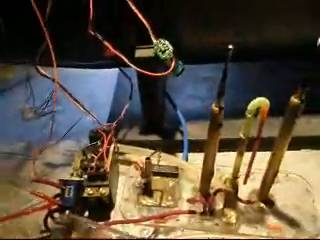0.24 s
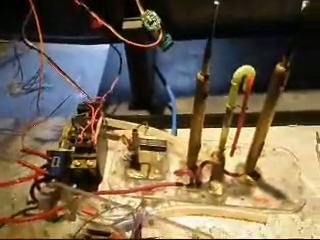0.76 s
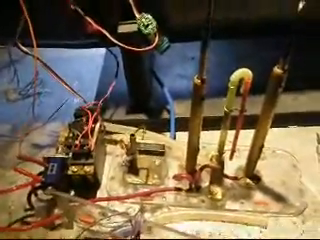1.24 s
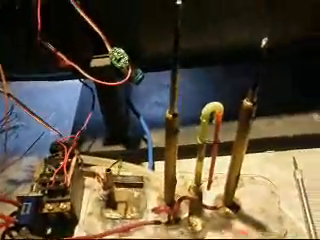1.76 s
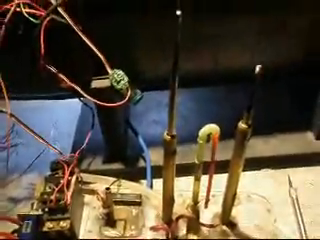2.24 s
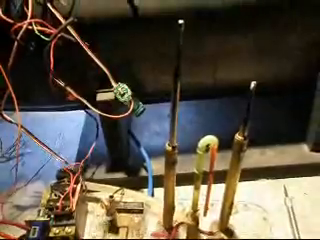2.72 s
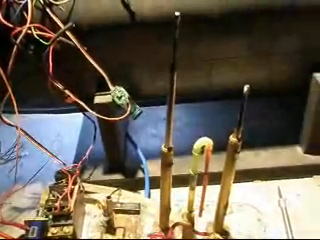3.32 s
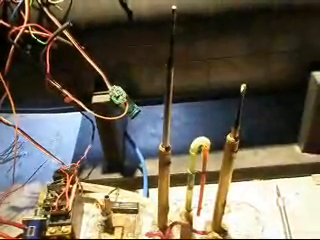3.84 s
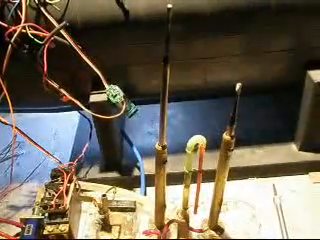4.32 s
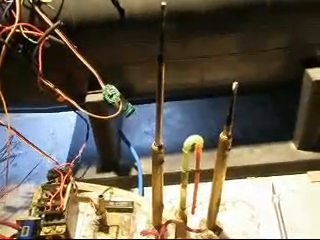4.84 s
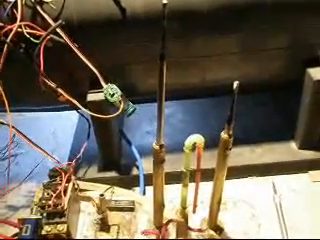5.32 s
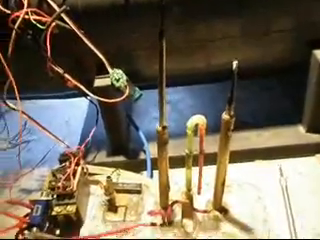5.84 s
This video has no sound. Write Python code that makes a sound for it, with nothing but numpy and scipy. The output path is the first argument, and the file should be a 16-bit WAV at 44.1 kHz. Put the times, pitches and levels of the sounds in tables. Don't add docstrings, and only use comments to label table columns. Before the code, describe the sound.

For the first 0.77 seconds there is only faint, dull workshop air and slight handling rumble. At about 0.79 a bright plastic switch click cracks, and a small brushed motor runs up within a twentieth of a second into a loud, buzzy air-pump whine, with a fundamental around 260 Hz and many strong harmonics, rough with rattling housing and brush swish. The bench hums underneath, kicking at first, then firmer from 2.1. Brief tonal flickers come between 2.1 and 2.8; the load steps up near 2.9, 3.6 and 4.4, the pitch sagging slightly to about 250. From 5.1 to 5.8 it stutters rapidly between timbres. Power is cut at 5.86; a short surge, then a falling, rattling coast to standstill by 6.07, a dull tick, and silence. Close cheap camera in a small room: coarse 8-bit grit, with mirrored metallic whine in the treble.

```python
import sys
import numpy as np
from scipy import signal
from scipy.fft import rfft, irfft, next_fast_len
from scipy.io import wavfile
from scipy.ndimage import uniform_filter1d, map_coordinates

SR = 44100
rng = np.random.default_rng(int(sys.argv[2]) if len(sys.argv) > 2 else 0)


def field_ratio(decibels):
    return 10 ** (np.asarray(decibels, dtype=float) / 20)


def unload_wav(signal):
    wavfile.write(
        sys.argv[1],
        SR,
        np.round(np.clip(np.atleast_2d(signal).T, -1, 1) * 32767).astype(np.int16),
    )


N = 267944


def set_rms(x, db):
    return x * field_ratio(db) / np.sqrt(np.mean(x ** 2))


def colour(x, points):
    hz, db = np.transpose(points)
    size = next_fast_len(N)
    bins = np.arange(size // 2 + 1) * SR / size + 1
    gain = field_ratio(np.interp(np.log(bins), np.log(hz), db))
    return irfft(rfft(x, size) * gain, size)[:N]


def walk(rate_hz):
    k = int(SR / rate_hz)
    held = np.repeat(rng.standard_normal(N // k + 1), k)
    return uniform_filter1d(uniform_filter1d(held, k), k)[:N] * np.sqrt(2)


def lag(x, s):
    k = 1 / max(s * SR, 1)
    return signal.lfilter([k], [1, k - 1], x - x[0]) + x[0]


# pitch_hz, level_db [dB per Hz]
AIR_SPECTRUM = [(20, -12), (90, -17), (170, -4), (400, -5), (900, -8), (2000, -13.5), (3900, -25.5),
                (4300, -65)]


def workshop_air():
    return set_rms(colour(rng.standard_normal(N), AIR_SPECTRUM), -56.5)


# pitch_hz, level_db [dB per Hz]
HANDS_SPECTRUM = [(15, -12.5), (30, 1), (70, -9), (130, -14), (220, -41)]


def handling_rumble():
    fits = field_ratio(4.5 * walk(6.4))
    return set_rms(colour(rng.standard_normal(N), HANDS_SPECTRUM) * fits, -73)


# start_s, stage [0 light, 1 rising, 2 firm, 3 heavy, 4 straining]
LOAD_SHIFTS = [
    (0, 1.4),
    (.822, .06),
    (2.88, 1.42),
    (3.575, 2.02),
    (4.355, 3.02),
    (5.18, 2.8),
]
# start_s, end_s, share [of a
BEARING_SLIPS = [(2.1, 2.16, .7), (2.43, 2.49, .95), (2.57, 2.615, .9), (2.64, 2.72, .95), (2.76, 2.8, .9),
                 (4.57, 4.68, -.8), (5.1, 5.17, .8), (5.275, 5.297, .98), (5.313, 5.355, .9),
                 (5.408, 5.435, .9), (5.468, 5.5, .9), (5.513, 5.54, .9), (5.55, 5.6, .85),
                 (5.635, 5.65, .9), (5.675, 5.72, .9), (5.735, 5.805, .9)]


def load_stage():
    t = np.arange(N) / SR
    start_s, stage = np.transpose(LOAD_SHIFTS)
    settled = stage[np.searchsorted(start_s, t, side="right").clip(1) - 1]
    slips = sum(share * ((t > start) & (t < end)) for start, end, share in BEARING_SLIPS)
    return uniform_filter1d(settled, SR // 40) + uniform_filter1d(slips, SR // 150)


ON_S, SPIN_UP_S = .772, .048
STAGE_HZ = [
    265.6,
    262.6,
    263.8,
    261.9,
    261.2,
]
HUNT_HZ = [
    .8,
    2.2,
    1.3,
    1.0,
    .8,
]


def shaft_hz(stage):
    t = np.arange(N) / SR
    sag_hz_per_s, stumble_hz, recover_s = 1.9, 2.6, .2
    felt = lag(np.where(t < ON_S + 2 * SPIN_UP_S, LOAD_SHIFTS[1][1], stage), .015)
    stages = np.arange(len(STAGE_HZ))
    hunt = walk(35)
    wander = np.interp(felt, stages, HUNT_HZ) * (hunt - lag(hunt, .04))
    stumble = stumble_hz * (felt - lag(felt, recover_s))
    return np.interp(felt, stages, STAGE_HZ) - sag_hz_per_s * (t - ON_S) - stumble + wander


# multiple [of shaft rate], level_db
LIGHT_WHINE = [(1, -4), (2, -13), (3, -4), (4, -6), (5, -12), (6, -9), (7, -2), (8, -8), (9, -4), (10, -2),
               (11, -16.5), (12, -11.5), (13, -7), (14, 0.5), (15, -15.5), (16, -11)]
RISING_WHINE = [(1, -5), (2, -5), (3, -8), (4, -3.5), (5, -8), (6, -11.5), (7, 1), (8, -8.5), (9, -1),
                (10, -6.5), (11, -25), (12, -7.5), (13, -13), (14, 0.5), (15, -13), (16, -19)]
FIRM_WHINE = [(1, -8), (2, -7.5), (3, -10), (4, -9), (5, -17.5), (6, -8), (7, 0), (8, -13.5), (9, -6),
              (10, -5), (11, -11.5), (12, -4.5), (13, -17), (14, -5), (15, -14.5), (16, -17.5)]
HEAVY_WHINE = [(1, -1), (2, -10), (3, -7), (4, -7.5), (5, -12), (6, -5.5), (7, -2), (8, -10), (9, -10.5),
               (10, 1), (11, -11.5), (12, -4.5), (13, -17), (14, -5), (15, -14), (16, -15)]
STRAINING_WHINE = [(1, 0), (2, -6.5), (3, -5), (4, -18), (5, -13), (6, -14.5), (7, -6), (8, -10.5), (9, -6),
                   (10, -3), (11, -12.5), (12, -5), (13, -17), (14, 1), (15, -13.5), (16, -12)]
UNPOWERED_WHINE = [(1, 0), (2, -6), (3, -3), (4, -10.5), (5, -7.5), (6, -9), (7, -2.5), (8, -10), (9, 1),
                   (10, -0.5), (11, -5.5), (12, -25.5), (13, -14), (14, -13), (15, -10), (16, -20.5)]
# place [0-1 of a turn], knock_db
BARS = [(.07, -6), (.2, -2), (.33, -5), (.48, -3), (.64, -6), (.77, 0), (.95, -8)]


def whine(turns, stage):
    tables = [LIGHT_WHINE, RISING_WHINE, FIRM_WHINE, HEAVY_WHINE, STRAINING_WHINE, UNPOWERED_WHINE]
    db = np.array(tables)[:, 1:, 1]
    db = db - 10 * np.log10(np.sum(field_ratio(db) ** 2, axis=1, keepdims=True) / 2)
    place, knock_db = np.transpose(BARS)
    out = 0
    for k, stage_db in enumerate(db.T, start=2):
        lead = np.angle(np.sum(field_ratio(knock_db) * np.exp(-2j * np.pi * k * place)))
        waver = k ** 0.24
        gain = field_ratio(np.interp(stage, np.arange(len(stage_db)), stage_db) + .7 * waver * walk(50))
        phase = 2 * np.pi * k * turns + lead - .012 * k ** 2 + .1 * waver * walk(60)
        out = out + gain * np.cos(phase)
    return out


# pitch_hz, level_db [dB per Hz]
HOUSING = [(120, -37.5), (200, -15.5), (390, -16), (650, -8), (920, -23), (1170, -13), (1450, -5),
           (2200, -0.5), (2500, -1), (2950, -6), (3250, -7), (3550, -0.5), (3850, -2), (4300, -18)]


def rattle(turns):
    place, knock_db = np.transpose(BARS)
    hits = (np.arange(int(turns[-1]))[:, None] + place).ravel()
    force = rng.standard_normal((len(hits) // len(place), len(place))) * field_ratio(knock_db)
    knocks = np.zeros(N)
    knocks[np.searchsorted(turns, hits)] = force.ravel()
    knocks = knocks * field_ratio(1.8 * walk(55))
    swish = rng.standard_normal(N) * field_ratio(1.3 * walk(15))
    return set_rms(colour(knocks, HOUSING), -8.5) + set_rms(colour(swish, HOUSING), -13)


def board_db():
    t = np.arange(N) / SR
    on_s, seated_s, off_s = .84, 2.11, 5.935
    kick = 6.5 * np.exp(-abs(t - on_s) / .1)
    seated = np.clip((t - seated_s) * 20, 0, 1) * 2.5
    growth = 1.25 * (t - seated_s).clip(0)
    rise, fall = 802 * (on_s - t).clip(0), 450 * (t - off_s).clip(0)
    return -36.5 + kick + seated + growth - rise - fall


CUT_S, COAST_S, STOP_S = 5.856, 5.895, 6.065


def motor():
    t, stage = np.arange(N) / SR, load_stage()
    hz = shaft_hz(stage)
    up = np.clip((t - ON_S) / SPIN_UP_S, .01, 1)
    down = np.clip((STOP_S - t) / (STOP_S - COAST_S), .01, 1) ** 1.1
    cut = np.clip((t - CUT_S) / .008, 0, 1)
    coasting = np.clip((t - COAST_S) / .018, 0, 1)
    surge_db = 2.5 * np.clip((t - CUT_S) / (COAST_S - CUT_S - .008), 0, 1)
    powered_db = -22.5 + 18 * np.log10(up) + surge_db + 0.5 * walk(18)
    coast_db = -29 + 52 * np.log10(down)
    db = powered_db + coasting * (coast_db - powered_db)
    loose_db = 10 * (1 - up) + 16 * coasting ** 1.3
    shake = walk(110)
    tremble = 1 + .006 * (shake - uniform_filter1d(shake, SR // 14))
    turns = np.cumsum(hz * up * down * tremble) / SR
    on = np.clip((t - ON_S - .007) / .004, 0, 1)
    body = field_ratio(db) * (whine(turns, stage + cut * (5 - stage)) + field_ratio(loose_db) * rattle(turns))
    board_turns = np.cumsum(hz * tremble) / SR
    board = np.sqrt(2) * field_ratio(board_db() + .6 * walk(25)) * np.cos(2 * np.pi * board_turns)
    return on * (body + board)


# start_s, level_db [peak], pitch_hz, t60_s, crack [0-1 noise share]
SWITCH_CLICKS = [
    (0.788, -9.5, 2717, 0.14, 0.58),
    (6.0695, -25.5, 1250, 0.013, 0.25),
]


def switch():
    out, t = np.zeros(N), np.arange(SR // 20) / SR
    for start_s, db, hz, t60_s, crack in SWITCH_CLICKS:
        ring = (1 - crack) * np.sin(2 * np.pi * hz * t)
        noise = crack * rng.standard_normal(len(t))
        click = (ring + noise) * field_ratio(db - 60 * t / max(t60_s, .003))
        i = int(start_s * SR)
        out[i:i + len(t)] += click[:N - i]
    return out


def room(x):
    t60_s, room_db = .3, -23
    t = np.arange(SR // 2) / SR
    tail = rng.standard_normal(len(t)) * field_ratio(-60 * t / t60_s) * (t > .006)
    tail = signal.lfilter([1], [1, -.6], tail)
    return signal.fftconvolve(x, tail * field_ratio(room_db) / np.sqrt(np.sum(tail ** 2)))[:N]


def scene():
    near = motor() + switch()
    return (near + room(near) + workshop_air() + handling_rumble())[None]


def camera_converter(x):
    hold_hz, steps = 8001.44, 128
    soft = signal.sosfilt(signal.butter(5, 4150, fs=SR, output="sos"), x)
    ticks = np.arange(int(N * hold_hz / SR) + 1)
    samples = map_coordinates(soft, [ticks * SR / hold_hz], order=3, mode="nearest")
    stairs = np.floor(samples * steps + 0.0079) / steps
    return stairs[(np.arange(N) * hold_hz / SR).astype(int)]


def spectral_rounding(x):
    bins = signal.stft(x - x.mean(), nperseg=2048, window="cosine")[2]
    nearby_power = uniform_filter1d(abs(bins) ** 2 + 1e-16, 25, axis=0)
    step = nearby_power ** (.7 / 2) * field_ratio(-27.5)
    kept = step * (np.round(bins.real / step) + 1j * np.round(bins.imag / step))
    return signal.istft(kept, nperseg=2048, window="cosine")[1][:N] + x.mean()


def top_cut(x):
    return signal.sosfilt(signal.butter(12, 13520, fs=SR, output="sos"), x)


# pitch_hz, level_db
BAND_EDGE = [(1, 0), (12750, 0), (12950, -80)]


def record(dry):
    held = camera_converter(dry[0])
    mix = colour(spectral_rounding(held), BAND_EDGE)
    mix = mix * (np.arange(N) < 6.0765 * SR)
    return top_cut(mix[None])


dry = scene()
out = record(dry)
unload_wav(out)
```